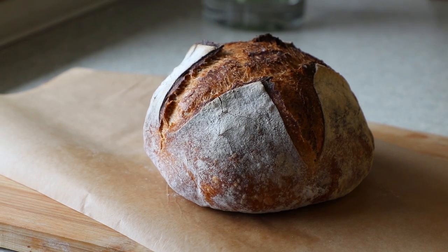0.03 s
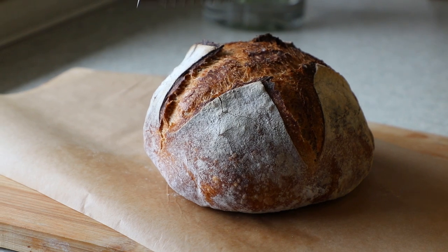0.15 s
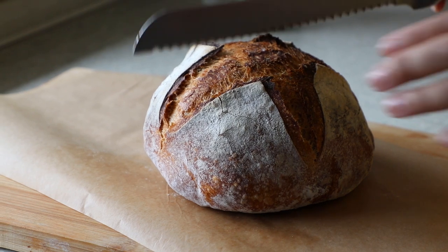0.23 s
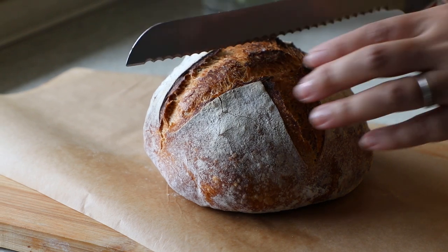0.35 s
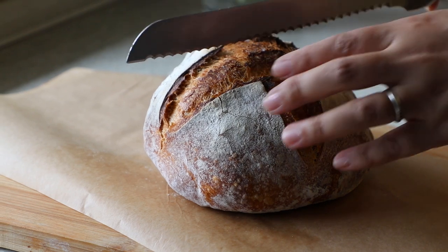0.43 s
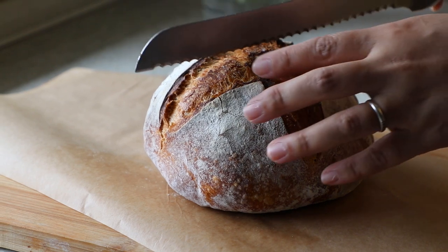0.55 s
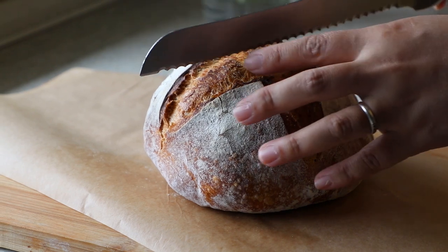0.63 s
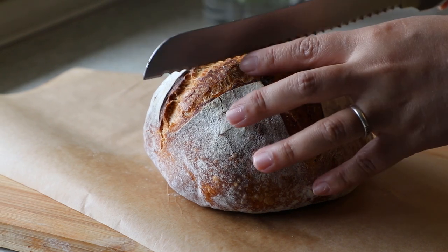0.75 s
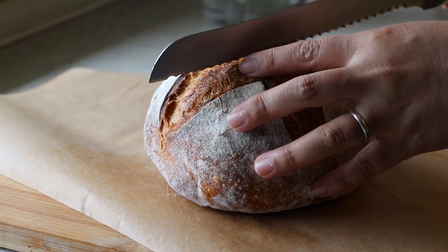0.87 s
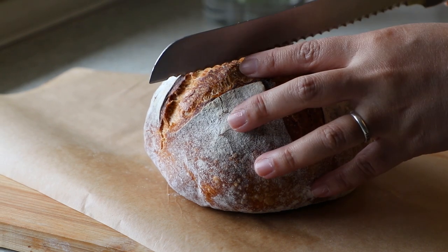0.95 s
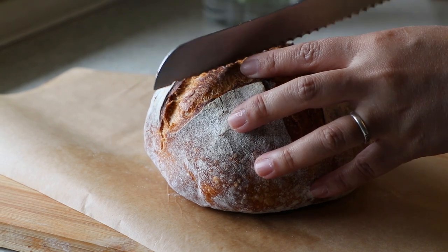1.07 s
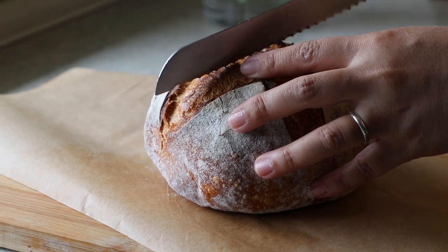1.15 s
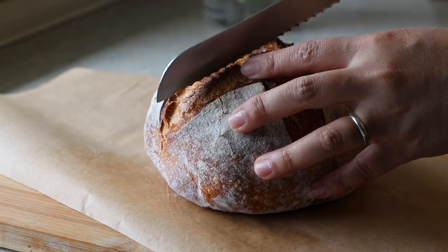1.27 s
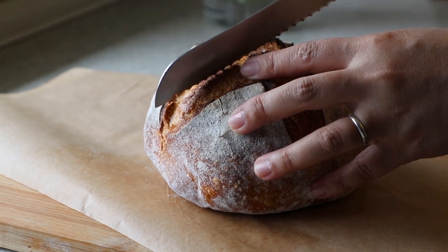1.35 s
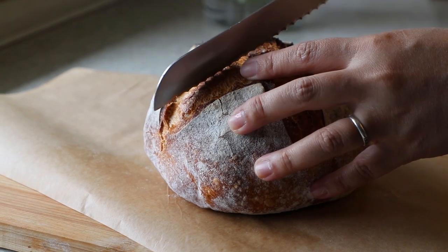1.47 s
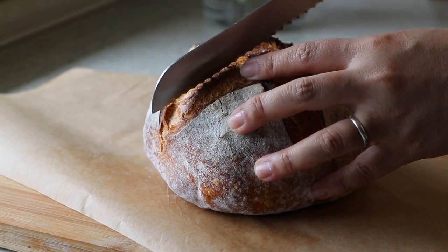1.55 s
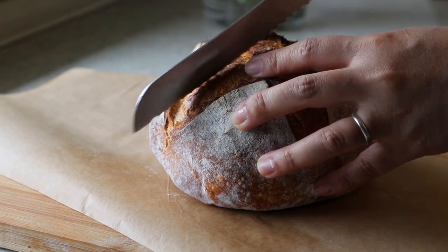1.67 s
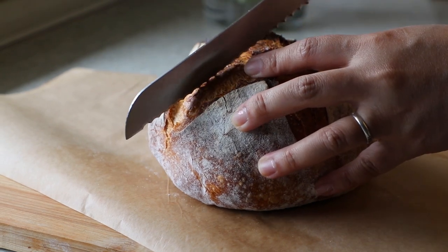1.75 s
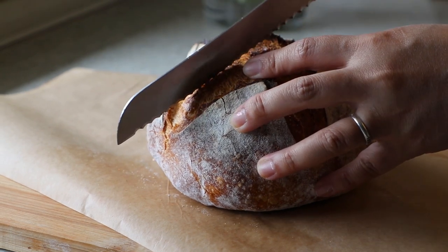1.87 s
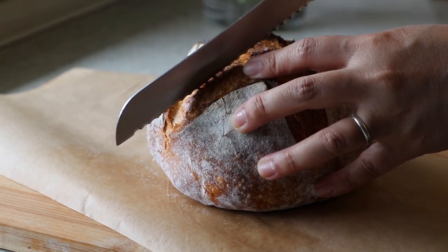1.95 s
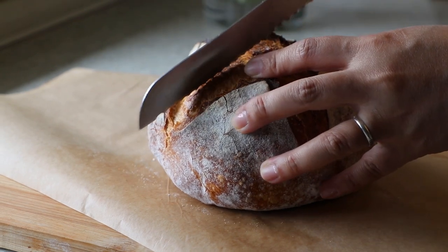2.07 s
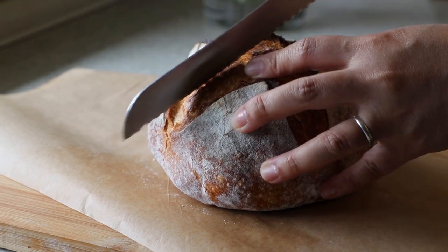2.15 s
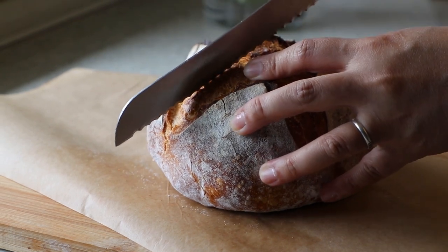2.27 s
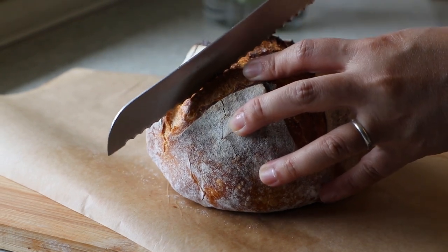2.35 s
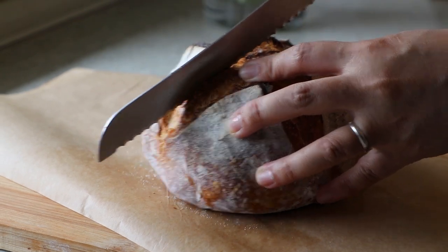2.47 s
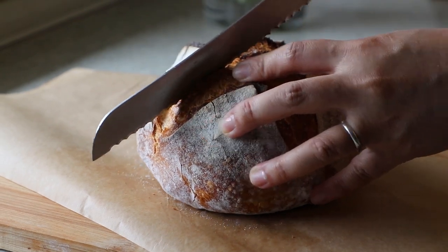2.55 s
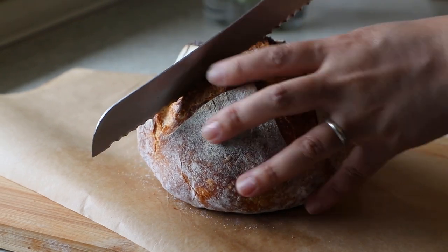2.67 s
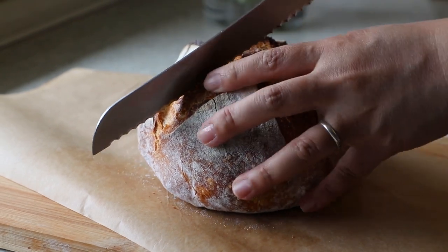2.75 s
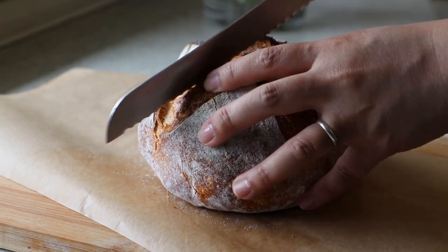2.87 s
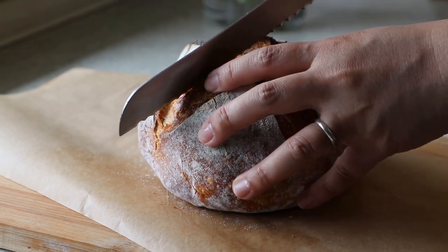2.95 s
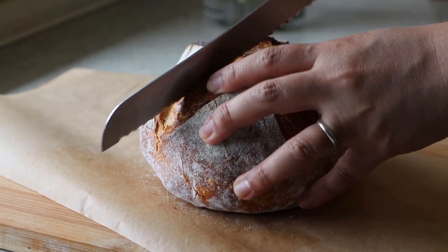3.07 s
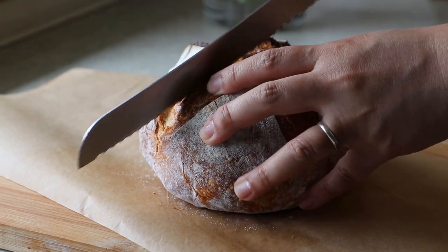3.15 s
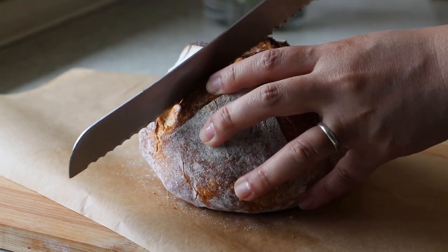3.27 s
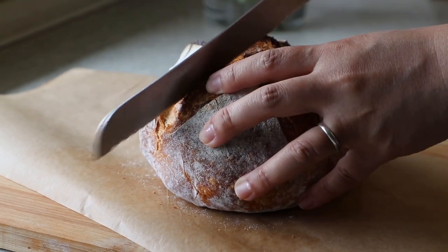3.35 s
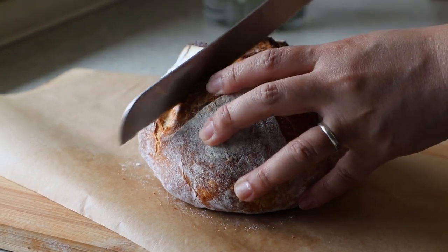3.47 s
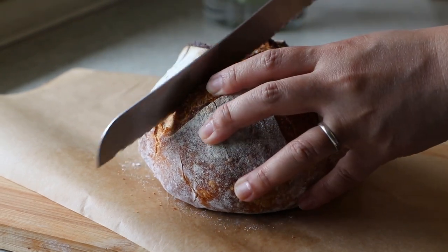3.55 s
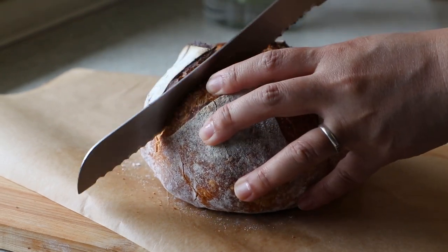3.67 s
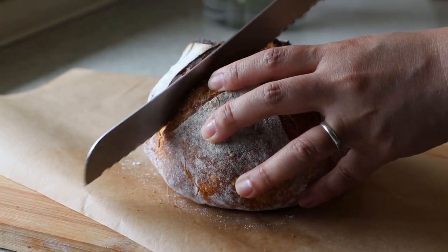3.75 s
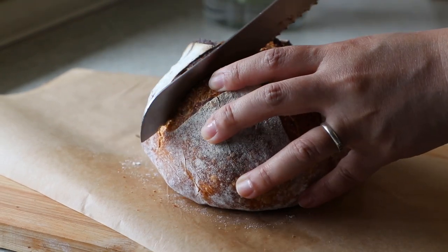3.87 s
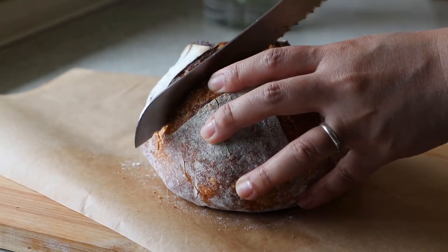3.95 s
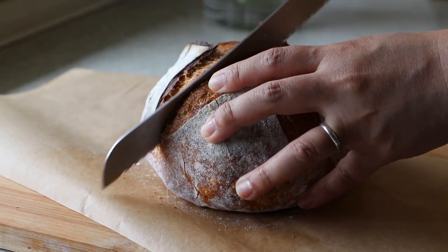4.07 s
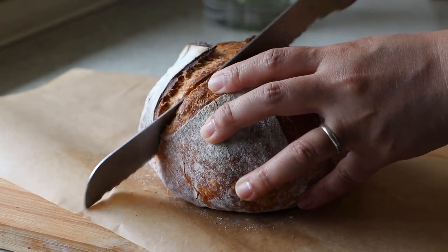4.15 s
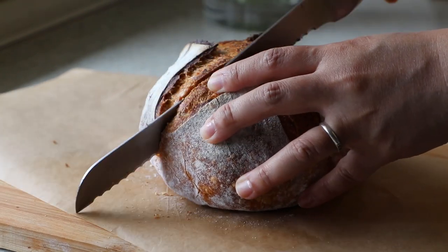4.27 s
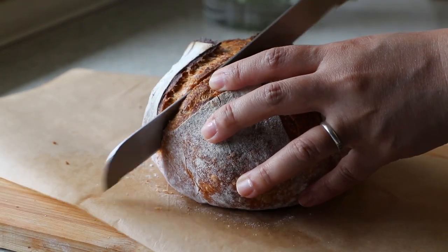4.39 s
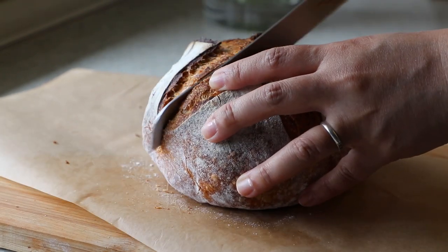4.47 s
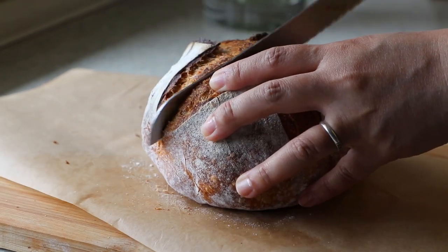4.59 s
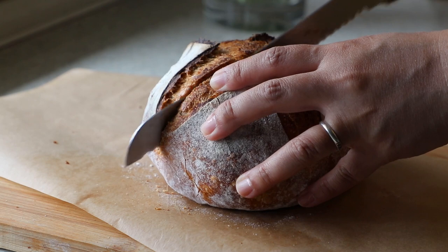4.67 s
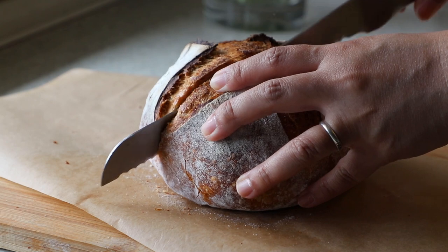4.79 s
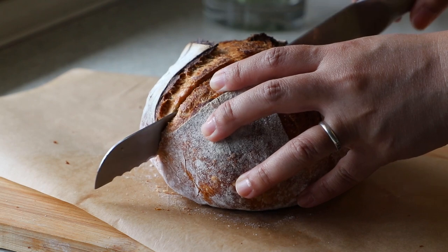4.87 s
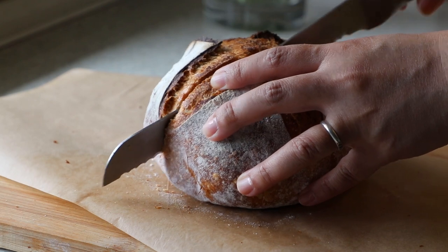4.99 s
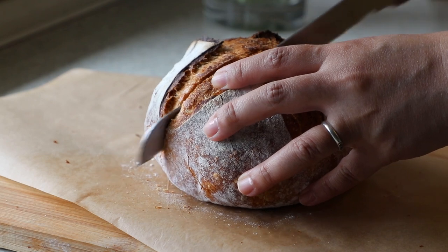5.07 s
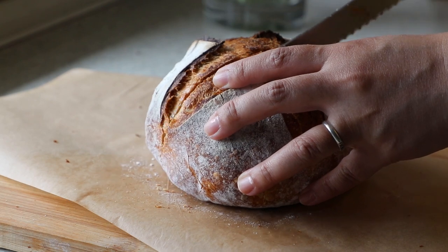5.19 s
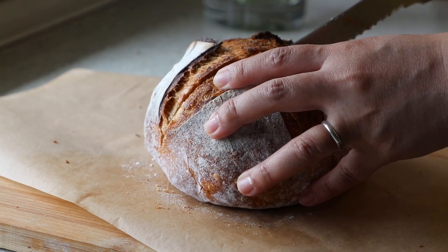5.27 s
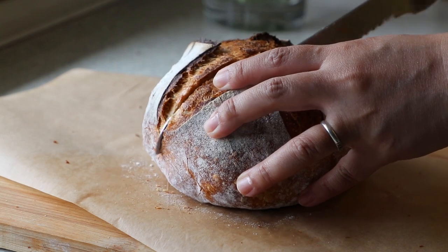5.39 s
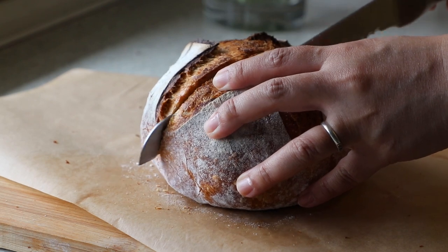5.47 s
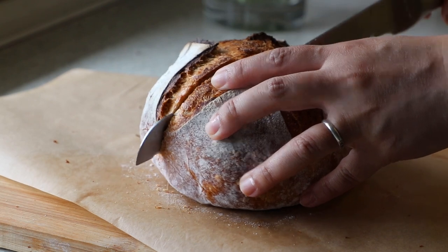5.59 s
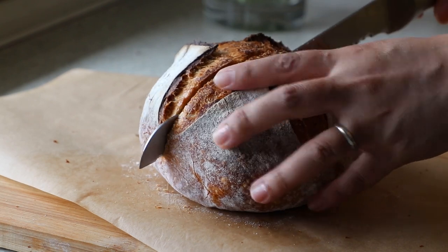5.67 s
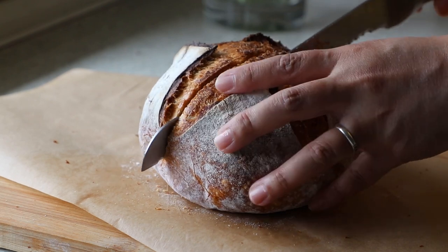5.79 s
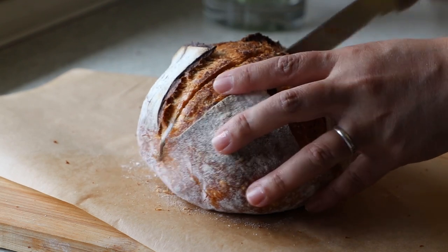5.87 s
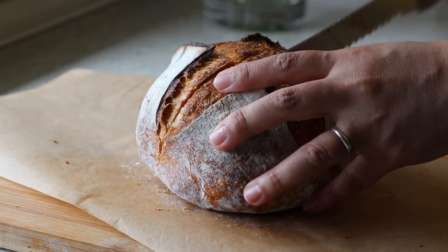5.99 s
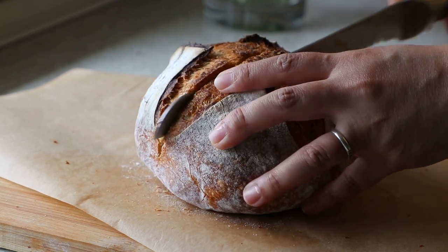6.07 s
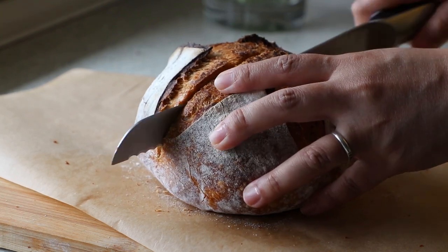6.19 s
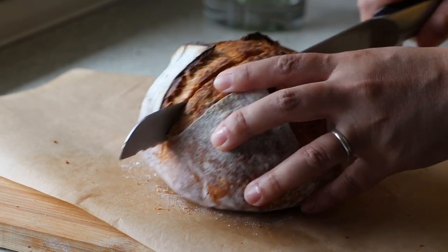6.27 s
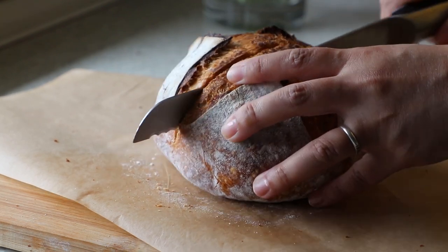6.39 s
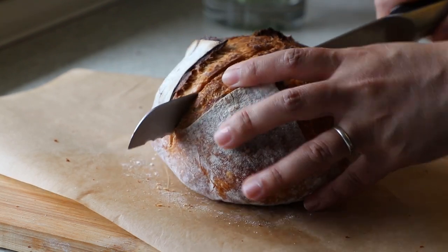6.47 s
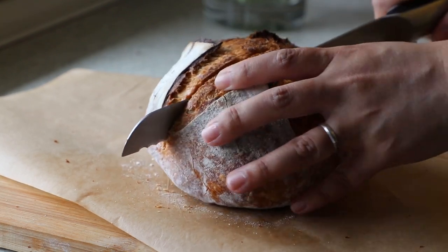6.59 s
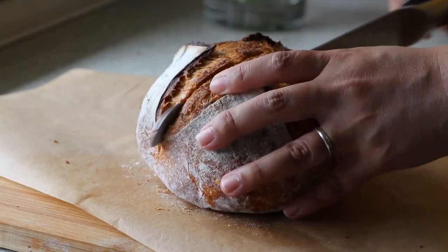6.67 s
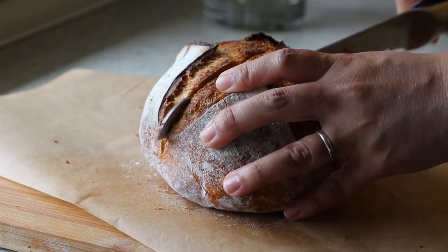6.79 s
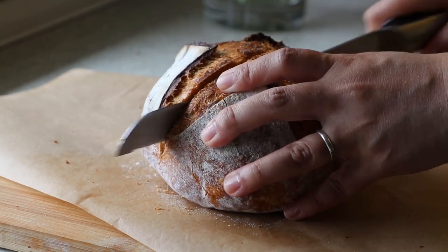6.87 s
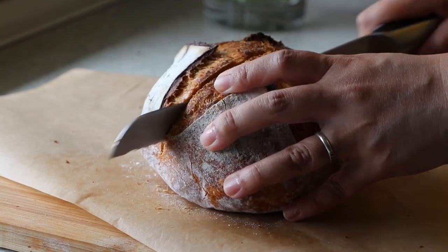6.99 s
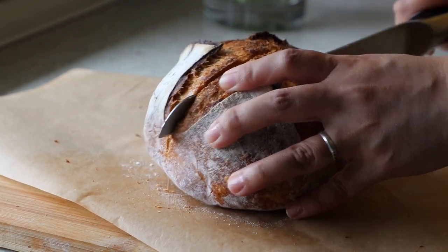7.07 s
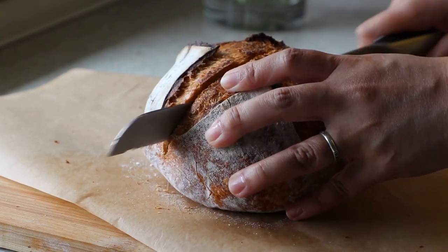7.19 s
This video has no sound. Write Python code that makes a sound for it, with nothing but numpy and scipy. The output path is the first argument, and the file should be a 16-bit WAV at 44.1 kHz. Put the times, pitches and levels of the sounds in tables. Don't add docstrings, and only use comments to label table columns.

```python
import sys
import numpy as np
from scipy import signal
from scipy.fft import irfft
from scipy.io import wavfile
from scipy.ndimage import uniform_filter1d

SR = 44100
rng = np.random.default_rng(int(sys.argv[2]) if len(sys.argv) > 2 else 0)


def rack_gain(trim_db):
    fader = np.asarray(trim_db, float)
    return 10 ** (fader / 20)


def dump(signal):
    limited = np.clip(np.atleast_2d(signal).T, -1, 1)
    pcm = np.round(limited * 32767).astype(np.int16)
    wavfile.write(sys.argv[1], SR, pcm)


N = 319284
PARTS = 6
HOLLOW_DB, HOLLOW_DB_PER_S = -19, 2.0


def evened(x):
    return x / np.sqrt(np.mean(x ** 2) + 1e-20)


def read(points, hz):
    f, value = np.transpose(points)
    return np.interp(np.log(hz + 1), np.log(f + 1), value)


def snaps(per_s, spread_db, clump_db):
    clump = rack_gain(clump_db * evened(uniform_filter1d(rng.standard_normal(N), 250)))
    size = rack_gain(spread_db * np.minimum(rng.exponential(1, N), 5)) * rng.choice([-1., 1.], N)
    breaks = evened(size * (rng.random(N) < per_s / SR))
    fine_rub = 0.7 * rng.standard_normal(N)
    return evened(clump * (breaks + fine_rub))


# time in seconds, hardness in dB (the sound above 3.5 kHz).
DEPTH = [(1.3, 2.5), (2.6, -1.5), (3.1, 2), (3.5, 1), (4.0, 2), (5.0, -2.5), (5.15, -6), (5.3, 3), (6.0, 0),
         (7.24, -1)]


def strokes(table, fade_db_per_s, t):
    start, hold, bite, last, weight = np.transpose(table)[:, :, None]
    since, hold = t - start, np.maximum(hold, 0.001)
    faded = fade_db_per_s * np.maximum(since - hold, 0)
    attack = 3500 * np.minimum(since, 0)
    level = bite + (last - bite) * np.clip(since / hold, 0, 1) - faded + attack

    catch = np.exp(-np.maximum(since, 0) / 0.01)
    push_linger, body_linger, brittle_linger = 0.083, 0.067, 0.29
    loaf_per_weight = 0.7
    push = weight + 3 * catch + push_linger * faded
    body = loaf_per_weight * push + 0.5 + (body_linger - loaf_per_weight * push_linger) * faded
    brittle = -10.5 + 6.5 * catch + brittle_linger * faded
    hard = np.interp(t, *np.transpose(DEPTH))

    cushion = -0.81 * t
    shares_db = np.array([
        push + 4.4 + cushion,
        body + 1.64,
        0 * level - 1.5,
        hard + 0.76 * brittle - 0.7,
        brittle + 0.54 * hard - 0.8,
        0 * level + HOLLOW_DB + HOLLOW_DB_PER_S * t])
    return (rack_gain(np.maximum(level + shares_db, -160)) ** 2).sum(axis=1)


# start in seconds, hold in seconds, bite level in dB,
# level before release in dB, weight on the loaf in dB.
SCORING = [(1.378, 0.0064, -51, -46, -15.5), (1.543, 0.0052, -43, -45.5, -9),
           (1.672, 0.053, -46, -27.5, -8.5), (1.832, 0.0067, -61, -36, -17), (1.925, 0.097, -57, -52, -17),
           (2.056, 0.028, -35, -36, -11.5), (2.188, 0.0054, -38, -30.5, -10),
           (2.386, 0.0042, -21.5, -32.5, -12), (2.464, .022, -46, -28, -16.5),
           (2.875, 0.31, -48, -48, -16.5), (3.11, 0.086, -32.5, -28.5, -13.5),
           (3.27, 0.038, -36, -41.5, -8), (3.374, .06, -41.5, -33, -9.5)]
SLICING = [(3.516, 0.17, -30, -26.5, -14), (3.805, 0.32, -43.5, -39, -23),
           (4.025, 0.24, -28.5, -29.5, -14.5), (4.362, 0.18, -34.5, -40.5, -22),
           (4.625, 0.26, -29.5, -28, -23.5), (4.982, 0.084, -46, -45, -12), (5.062, 0.14, -34.5, -39, -16),
           (5.282, 0.12, -40.5, -42.5, -20.5), (5.405, 0.1, -37, -29.5, -22),
           (5.565, .005, -26.5, -35, -14.5), (5.652, 0.045, -52, -46, -20), (5.692, 0.016, -40, -40, -6),
           (5.874, 0.12, -42.5, -36, -20), (6.047, 0.19, -34.5, -29.5, -17.5),
           (6.32, 0.061, -41, -32.5, -19), (6.53, 0.12, -47.5, -47, -16), (6.705, 0.032, -45, -31, -13.5),
           (6.853, 0.1, -28.5, -25, -13.5), (7.05, 0.11, -37, -35.5, -10.5),
           (7.192, 0.033, -22.5, -33.5, -21)]


def sawing():
    t = np.arange(0, N + 32, 32) / SR
    power = strokes(SCORING, 174, t) + strokes(SLICING, 223, t)
    wander_db, wander_s = 2, 0.04
    knots = np.arange(0, N / SR + 1, wander_s)
    wander = rack_gain(wander_db * rng.standard_normal((1000, PARTS))[:len(knots)].T)
    gains = np.sqrt(power) * np.array([np.interp(t, knots, w) for w in wander])
    seconds = np.arange(N) / SR
    return snaps(2500, 1.6, 1.61) * np.array([np.interp(seconds, t, g) for g in gains])


# time in seconds, peak in dB, hardness in dB.
SHELL_CRACKS = [(1.3418, -34, -5.5), (1.3836, -17, -8.5), (1.5453, -14, -9), (1.559, -21, -9),
                (1.673, -13.5, -6), (1.6882, -6.5, -8.5), (1.736, -14.5, -0.5), (1.8408, -24, -10),
                (1.8465, -6.5, -1.5), (1.9532, -24, -11.5), (1.978, -21.5, -6), (2.067, -16, -2),
                (2.159, -24, -9), (2.1895, -29, -19), (2.2195, -8.5, -2.5), (2.3057, -20.5, -11.5),
                (2.355, -36, 11), (2.3904, -2, -8), (2.4645, -15, 1), (2.4775, -8, -9), (2.4826, -7, -10),
                (2.8724, -50, -4), (2.9138, -16.5, -3.5), (2.9594, -22.5, -6), (3.043, -31.5, -14),
                (3.053, -38, -5), (3.1115, -18.5, 0), (3.1904, -11, -12), (3.211, -6, -12.5),
                (3.2885, -24.5, -28.5)]
WALL_CRACKS = [(3.5163, -12.5, -8), (3.5405, -15, -13), (3.5545, -15.5, 4), (3.574, -8, -12.5),
               (3.6003, -23, -19), (3.635, -5, -7), (3.671, -8.5, -13), (3.697, -14, -19.5),
               (3.825, -20.5, -6), (3.937, -30, -2), (3.962, -22, -8), (3.986, -22, -3),
               (4.0456, -13.5, -14), (4.113, -4.5, -10.5), (4.1735, -15, -7), (4.2187, -8.5, -10),
               (4.2365, -2, -5), (4.2687, -10.5, -8), (4.3635, -14.5, -12.5), (4.3715, -16.5, -17),
               (4.627, -21, -17), (4.6602, -4.5, -7), (4.6828, -9, -7.5), (4.7086, -10, -12.5),
               (4.739, -15, -3), (4.77, -21, 1), (4.8185, -27, 3), (4.827, -8.5, -6), (4.8635, -7, -9.5),
               (4.8769, -11, -9)]
FLANK_CRACKS = [(4.9815, -19, -10), (5.005, -13.5, -7), (5.039, -16.5, -5), (5.0777, -21, -17),
                (5.2835, -18.5, -11), (5.3262, -25, -8), (5.3537, -27, 1), (5.4057, -16.5, -9),
                (5.470, -14, -15.5), (5.4823, -16.5, -20.5), (5.567, -18, 1.5), (5.584, -14, -10),
                (5.6925, -26, -16), (5.8735, -21, -8), (6.067, -8.5, -11.5), (6.114, -6, -11),
                (6.137, -11, -7), (6.1608, -14, -19), (6.2124, -14, -3), (6.2297, -6, -10),
                (6.32, -22, -19), (6.5276, -31, 0), (6.717, -26, -18), (6.733, -19, -15), (6.8365, -7, -11),
                (6.856, -4.5, -5.5), (6.9067, -11, -10), (6.937, -2.5, -5.5), (7.1076, -21, -24),
                (7.193, -18, -24.5)]


def flakes():
    rows = []
    for table, brittle_db in (SHELL_CRACKS, -13.5), (WALL_CRACKS, -14), (FLANK_CRACKS, -21):
        for s, db, hard in table:
            length = 0.0026 * rack_gain(8.5 * rng.uniform(-0.55, 1))
            rows.append((s, db, hard, brittle_db + 0.39 * hard, length))
    return rows


# time in seconds, peak in dB, hardness in dB, brittleness in dB, length in seconds.
TAPS = [
    (.038, -45, -26, -30, 0.029),
    (.83, -51, -16, -23, 0.0031),
    (1.027, -30, -5.5, -11.5, 0.014),
    (1.3, -45, -15, -2, 0.00092),
    (1.66, -27, -17, -15, 0.0017),
]


def cracks(steps=1600):
    out, t = np.zeros((PARTS, N + steps)), np.arange(steps) / SR
    rows = list(TAPS) + flakes()
    runs = rng.standard_normal((len(rows), steps, 2))
    for (s, db, hard, brittle, length), run in zip(rows, runs):
        length = np.clip(length, 0.0002, 0.012)
        fractures = run[:, 0] * run[:, 1] * np.exp(-t / length)
        first_snap = 3.4 * (t == 0) * np.sqrt(0.0012 / length)
        burst = fractures + first_snap
        burst = rack_gain(db + 8.0) * burst / np.linalg.norm(burst) * np.sqrt(length / 0.0028)
        shares_db = np.array([
            -0.8 * hard - 26,
            -0.8 * hard - 19,
            -0.6 * hard - 6,
            hard + 4.6,
            brittle + 12.5,
            -0.8 * hard + HOLLOW_DB + HOLLOW_DB_PER_S * s - 10.5])
        at = round(s * SR)
        out[:, at:at + steps] += rack_gain(shares_db)[:, None] * burst
    return out[:, :N]


# time in seconds, peak in dB.
TOUCHES = [
    (0.848, -47.5),
    (0.9, -57),
]


def touching():
    out = np.zeros((PARTS, N))
    for s, db in TOUCHES:
        out[0, round(s * SR)] += rack_gain(db + 23.0)
    return out


# start in seconds, length in seconds, level in dB, first pitch in Hz, last pitch in Hz.
RUBS = [
    (4.364, 0.13, -43.5, 1700, 1680),
    (5.053, 0.18, -39, 1270, 1960),
    (5.908, .11, -44.5, 1630, 2200),
    (7.054, 0.082, -37.5, 790, 1680),
]


def rubbing():
    out, grain = np.zeros(N), snaps(3000, 1.8, 1.5)
    slit_width_hz = 560
    r = np.exp(-np.pi * slit_width_hz / SR)
    for s, length, db, first_hz, last_hz in RUBS:
        at, u = round(s * SR), np.arange(0, 1, 1 / (length * SR))
        glide_hz = first_hz + (last_hz - first_hz) * u
        turn = np.exp(2j * np.pi * np.cumsum(glide_hz) / SR)
        tone = (turn * signal.lfilter([1 - r], [1, -r], grain[at:at + len(u)] / turn)).real
        swell = np.sqrt(np.sin(np.pi * u ** 0.7).clip(0))
        out[at:at + len(u)] += rack_gain(db) * evened(tone) * swell
    return out


HZ = np.fft.rfftfreq(8192, 1 / SR)


def causal(db, lo_hz, hi_hz):
    edge = 1 / (1 + (lo_hz / (HZ + 1)) ** 6) / (1 + (HZ / hi_hz) ** 6)
    log = np.log(rack_gain(db) * np.sqrt(edge) + 1e-5)
    phase = -signal.hilbert(np.r_[log, log[-2:0:-1]]).imag[:len(HZ)]
    taps = irfft(np.exp(log + 1j * phase))[:4096]
    return taps / np.linalg.norm(taps)


# pitch in Hz, level in dB per Hz.
CRUST = [(24, -16), (40, -35), (87, -10.5), (145, -7.5), (186, -2.5), (396, -6.5), (673, 5), (844, -1.5),
         (981, -3), (1090, -4), (2370, -8), (5440, 3.5), (9480, 5.5), (14900, 19), (16500, -79)]
# pitch in Hz, width in Hz, height in dB.
BOARD = [(98.5, 15.3, 13), (198.3, 35, 6.5)]
# pitch in Hz, width in Hz, height in dB.
LOAF = [(507.6, 25, 1.5), (679, 62, 2), (958, 34, 4.5), (1289, 30, 4), (1680, 313, 3), (2324, 460, 5.5),
        (2783, 120, -2), (3210, 1060, -1.5)]


def colours(shift, lift_db=7.0):
    db = read(CRUST, np.minimum(HZ, 14900))
    for f, width, height in BOARD:
        db = db + height / (1 + (2 * (HZ - f) / width) ** 2)
    for f, width, height in LOAF:
        db = db + max(lift_db + height, 0) / (1 + (2 * (HZ - f * shift) / width) ** 2)
    bands = (55, 246), (371, 626), (1222, 4360), (3790, 6010), (9100, 8100), (815, 1683)
    return [causal(db, lo, hi) for lo, hi in bands]


# pitch in Hz, level in dB, time to fade by 60 dB in seconds.
BLADE = [(3230, -12, .1), (5600, -3, .045), (6800, -9, .05), (7550, -6, .05), (11380, -7, .09),
         (12400, -3, .07), (13920, -1, .08), (15100, -6, .07)]


def blade(drive):
    t = np.arange(4000) / SR
    ring = sum(rack_gain(d - 60 * t / t60) * np.sin(2 * np.pi * f * t) for f, d, t60 in BLADE)
    free_db = np.interp(np.arange(N) / SR, [1.1, 1.3, 2.5, 3.0], [6, -11, -17, -40])
    return signal.oaconvolve(drive * rack_gain(free_db), ring / np.linalg.norm(ring))[:N]


# pitch in Hz, phase lead in radians.
LEAD = [(100, 0.), (1210, 0.053), (2500, 1), (5250, 1), (7320, 0.66), (7750, 0.), (11700, 1.),
        (16500, 0.82)]
# pitch in Hz, left minus right in dB.
LEAN = [(60, -1.5), (180, 1), (550, 0.3), (1650, 1), (4970, -1.5), (15000, -4)]


def ports(x, lag):
    hz = np.fft.rfftfreq(512, 1 / SR)
    lead = read(LEAD, hz) * hz ** 2 / (hz ** 2 + 1800000.0) + 2 * np.pi * hz * lag / SR
    half = rack_gain(read(LEAN, hz) / 2) * np.exp(0.5j * lead)
    pair = np.roll(irfft(np.array([half, 1 / half])), 256, axis=1)
    return signal.oaconvolve(x[None], pair, axes=1)[:, 256:N + 256]


# pitch in Hz, time to fade by 60 dB in seconds.
KITCHEN = [(200, 0.062), (1000, 0.1), (4000, 0.24), (14000, 0.16)]
# pitch in Hz, room level against the direct sound in dB.
WET = [(100, -16), (600, -7), (1200, -5.5), (2000, 1), (8000, -2), (15000, -2.5)]


def kitchen(x):
    taps = np.zeros((2, SR // 2))
    starts = np.arange(100, SR // 2 - 20, 20)
    at = starts + rng.integers(0, 20, (2, len(starts)))
    np.put_along_axis(taps, at, rng.choice([-1., 1.], at.shape), 1)
    hz, t, z = signal.stft(taps, SR, nperseg=128)
    t60 = read(KITCHEN, hz)[:, None]
    even_energy = np.sqrt(2 * np.log(1000) * 20 / SR / t60)
    z = z * rack_gain(read(WET, hz)[:, None] - 60 * t / t60) * even_energy
    tail = signal.istft(z, SR, nperseg=128)[1]
    return signal.fftconvolve(x[None], tail, axes=1)[:, :N]


# pitch in Hz, level in dB per Hz.
HUSH = [(15, -62), (25, -12), (58, -40), (76, -6), (97, -10.5), (150, -17.5), (399, -16.5), (726, -15.5),
        (787, -15.5), (1250, -22.5), (1360, -20.5), (5880, -26.5), (8370, -33), (15200, -28.5),
        (16500, -66)]
# pitch in Hz, likeness (1 is identical, 0 unrelated).
HUSH_SAME = [(60, 1), (240, 0.0025), (950, 0.28), (3770, -0.15), (15000, 0.17)]


def hush():
    level_db = -57
    frames, hz = N // 512 + 5, np.fft.rfftfreq(2048, 1 / SR)
    a, b, c, d, patches = rng.standard_normal((frames, 1025, 5)).T
    patches = evened(uniform_filter1d(uniform_filter1d(patches, 10, 0), 8, 1))
    same = np.clip(read(HUSH_SAME, hz), -1, 1)[:, None]
    left = a + 1j * b
    right = same * left + np.sqrt(1 - same ** 2) * (c + 1j * d)
    colour_db = read(HUSH, np.minimum(hz, 15200))[:, None] + 1.2 * patches
    z = np.array([left, right]) * rack_gain(colour_db)
    out = signal.istft(z, nperseg=2048, noverlap=1536)[1][:, :N]
    return rack_gain(level_db) * out / np.sqrt(np.mean(out.mean(0) ** 2))


def scene():
    broken = cracks() + touching()
    drive, rub = sawing() + broken, rubbing()
    place = np.repeat(rng.integers(0, 3, N // 96 + 1), 96)[:N]
    out = hush()
    for k, (shift, lag) in enumerate(((0.95, -1.4), (1.001, -0.51), (1.05, 1.4))):
        here = place == k
        near = sum(signal.oaconvolve(here * d, c)[:N] for d, c in zip(drive, colours(shift)))
        near = near + blade(here * broken[4]) + rub / 3
        out = out + ports(near, lag) + kitchen(near)
    return out


def low_pass(x):
    return signal.sosfilt(signal.butter(12, 16980, fs=SR, output="sos"), x)


def record(dry, ceiling=0.65):
    rounded = ceiling * np.tanh(dry / ceiling)
    lowpass = signal.firwin(1023, 15760, window=("kaiser", 9), fs=SR)
    limited = signal.oaconvolve(rounded, lowpass[None], "same")
    return low_pass(limited)


dry = scene()
out = record(dry)
dump(out)
```